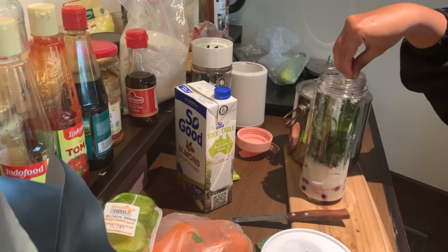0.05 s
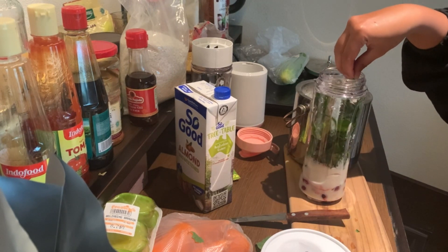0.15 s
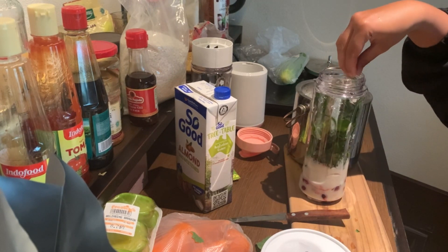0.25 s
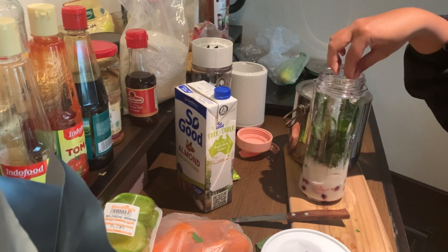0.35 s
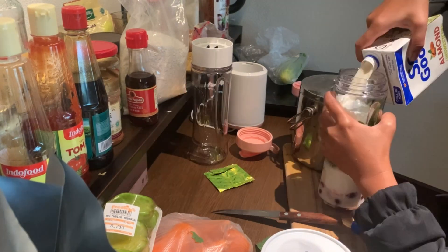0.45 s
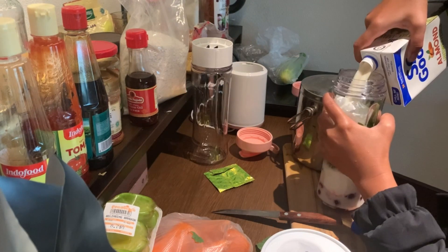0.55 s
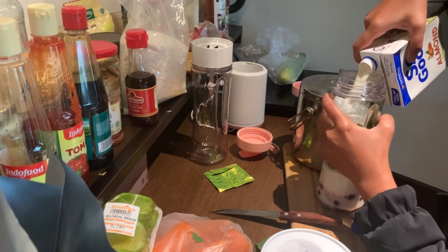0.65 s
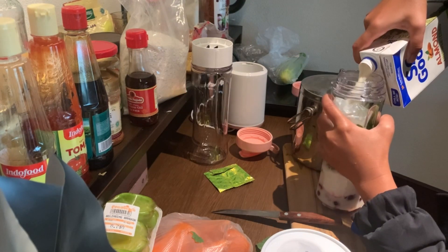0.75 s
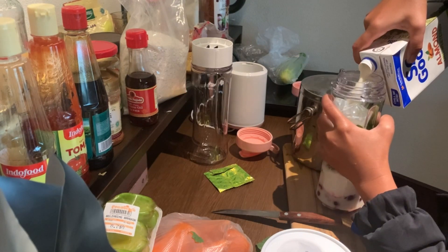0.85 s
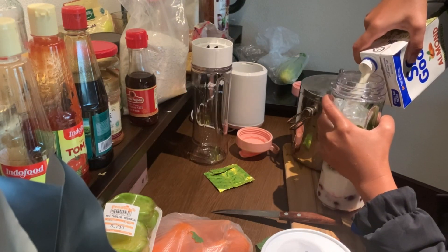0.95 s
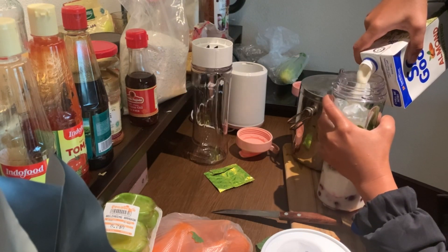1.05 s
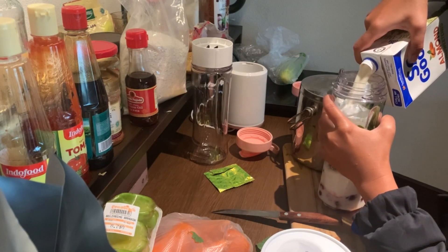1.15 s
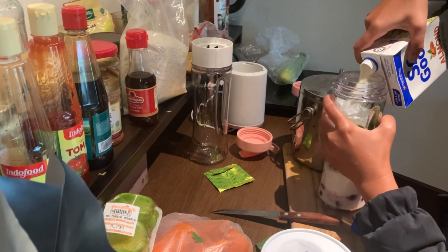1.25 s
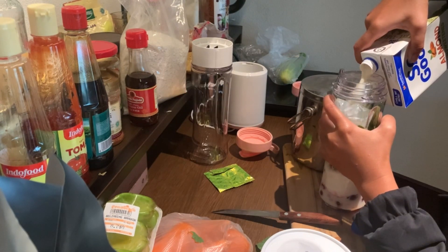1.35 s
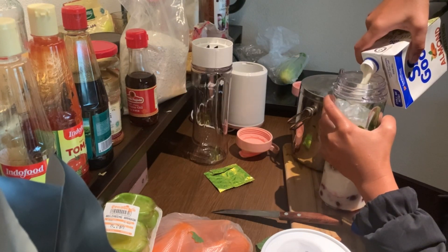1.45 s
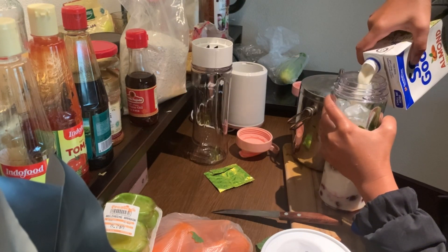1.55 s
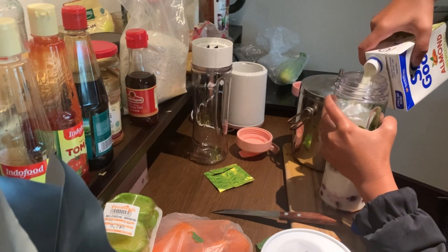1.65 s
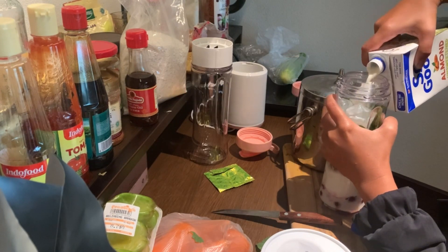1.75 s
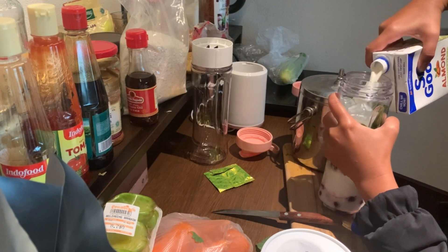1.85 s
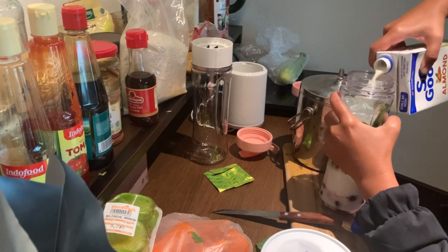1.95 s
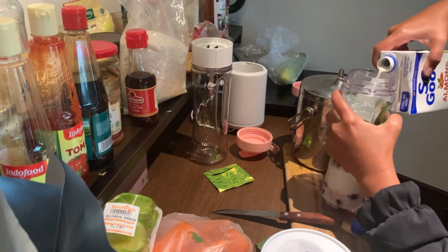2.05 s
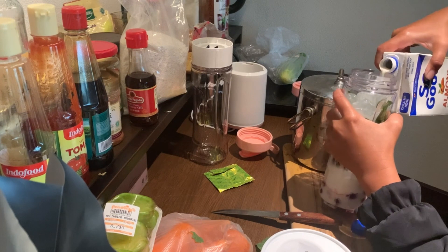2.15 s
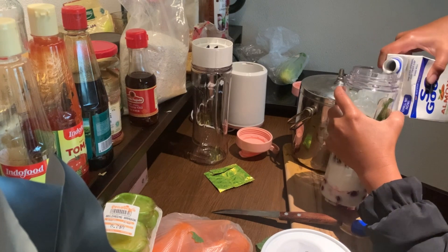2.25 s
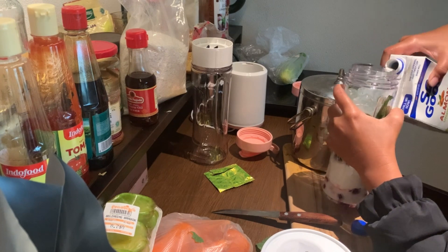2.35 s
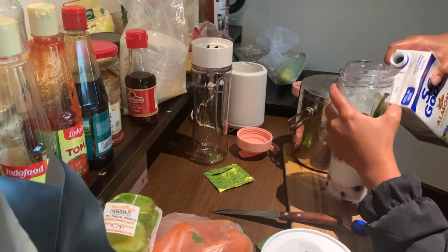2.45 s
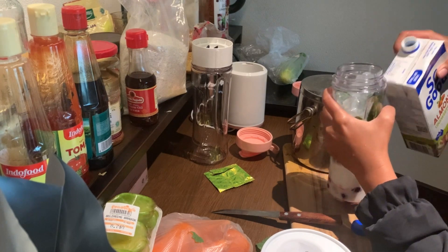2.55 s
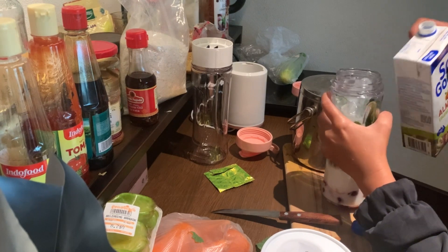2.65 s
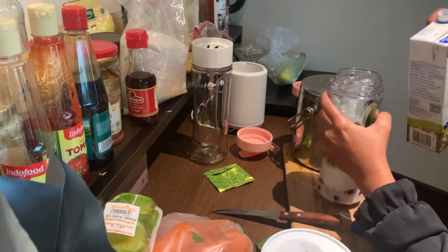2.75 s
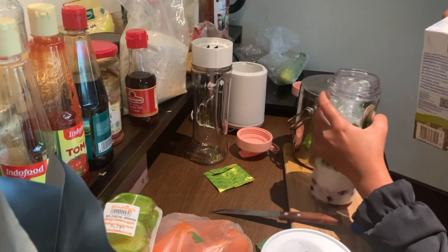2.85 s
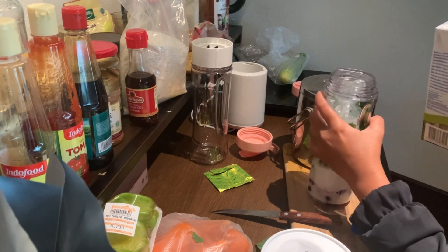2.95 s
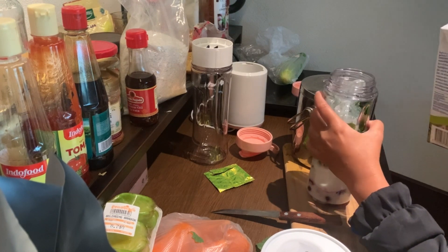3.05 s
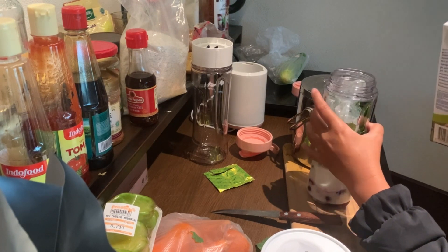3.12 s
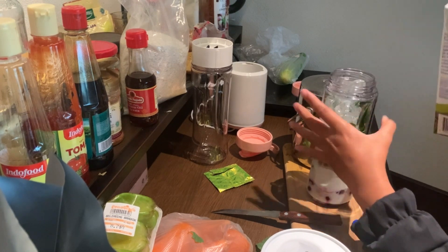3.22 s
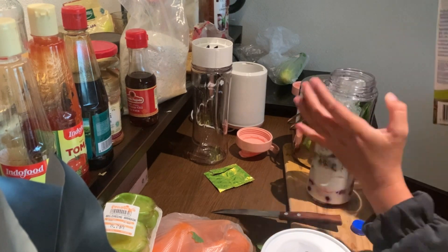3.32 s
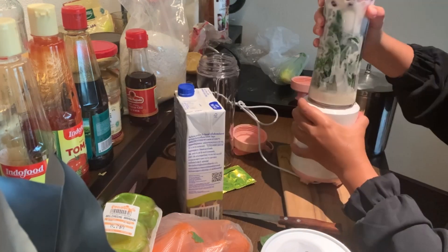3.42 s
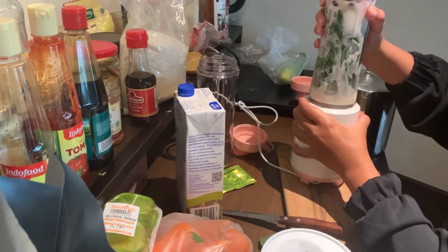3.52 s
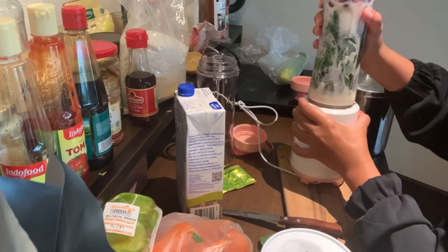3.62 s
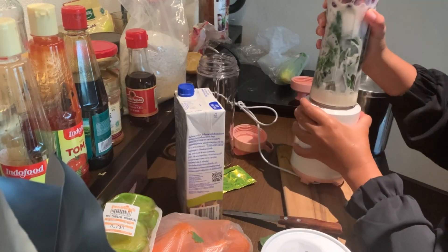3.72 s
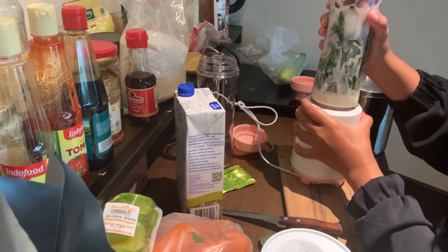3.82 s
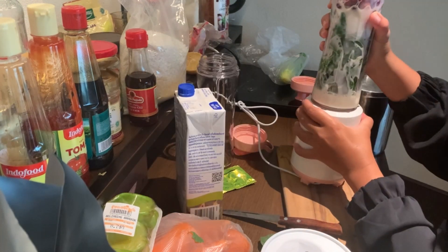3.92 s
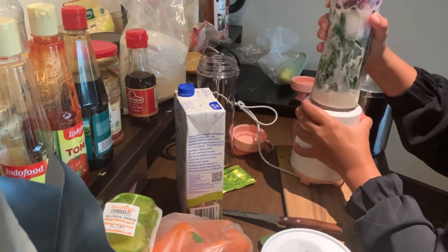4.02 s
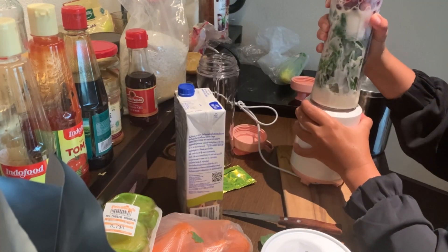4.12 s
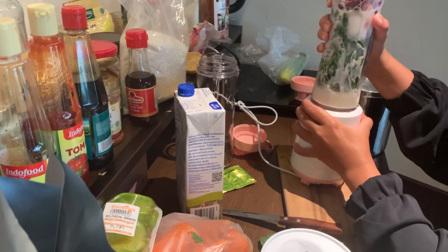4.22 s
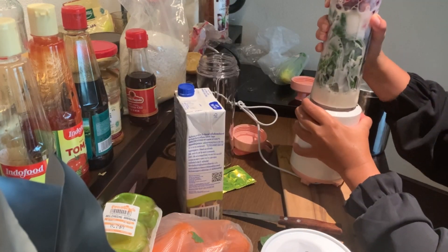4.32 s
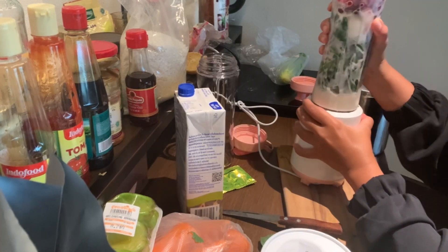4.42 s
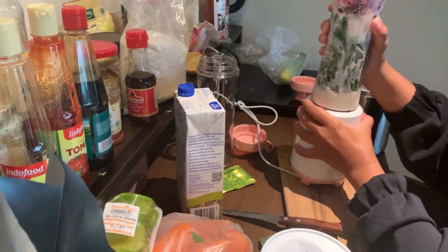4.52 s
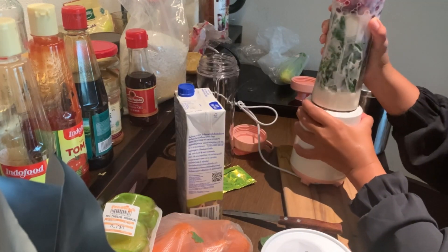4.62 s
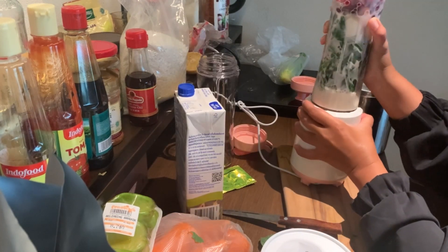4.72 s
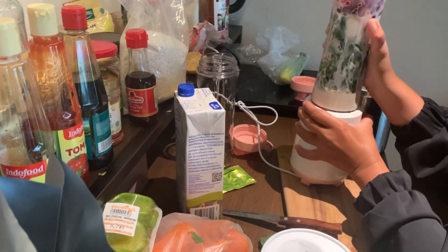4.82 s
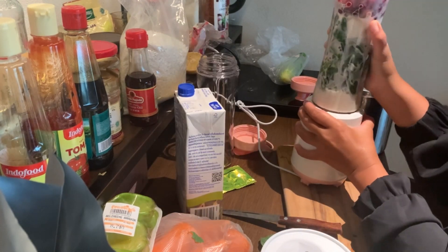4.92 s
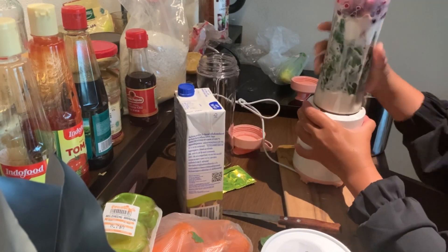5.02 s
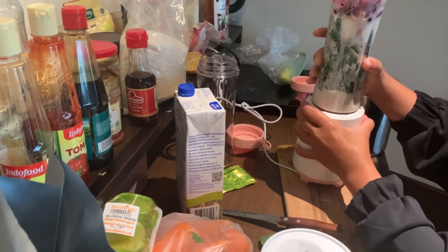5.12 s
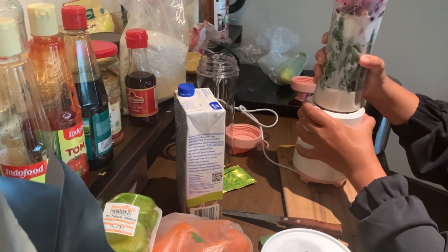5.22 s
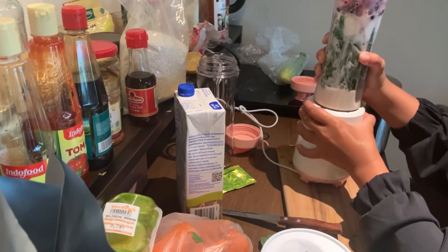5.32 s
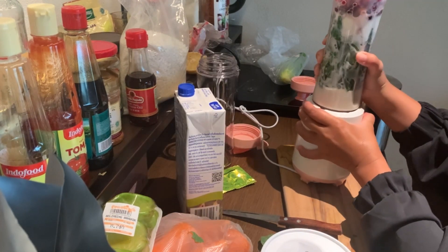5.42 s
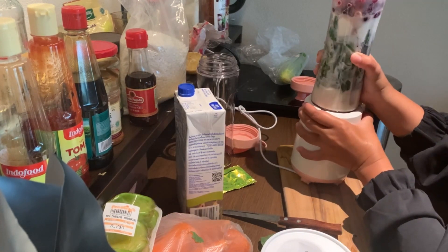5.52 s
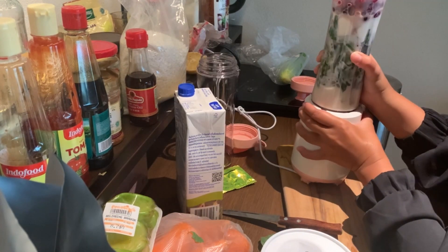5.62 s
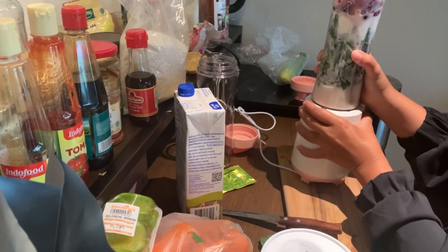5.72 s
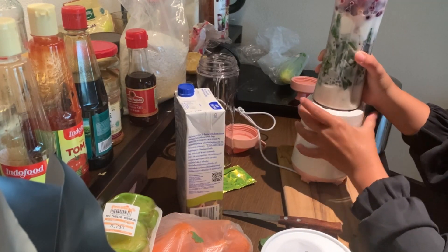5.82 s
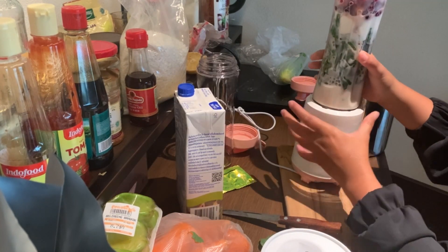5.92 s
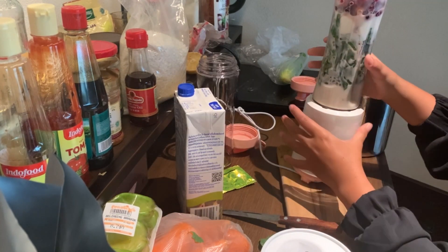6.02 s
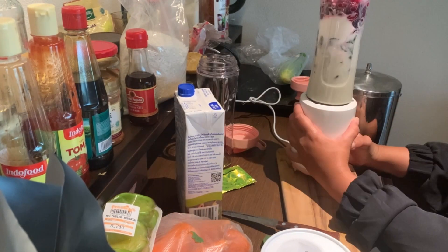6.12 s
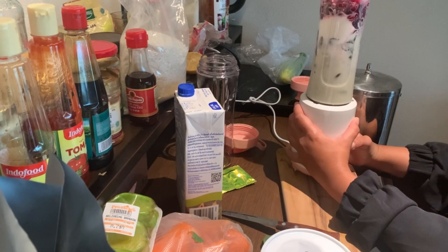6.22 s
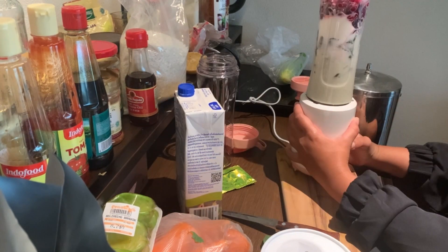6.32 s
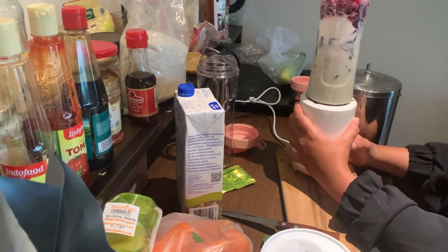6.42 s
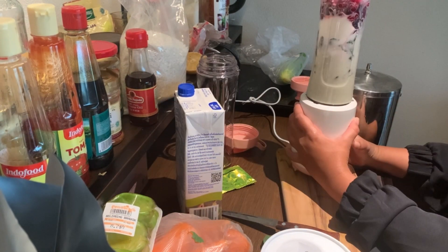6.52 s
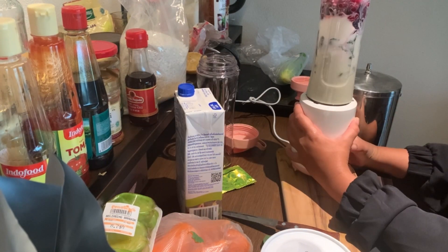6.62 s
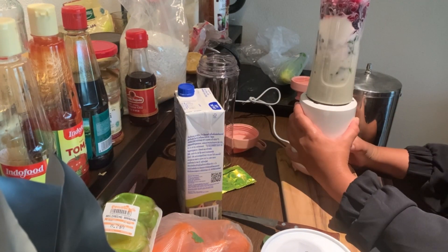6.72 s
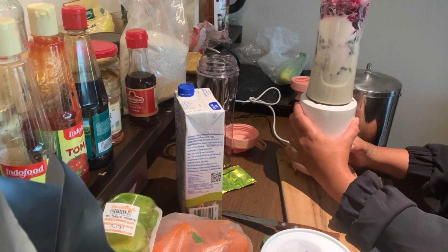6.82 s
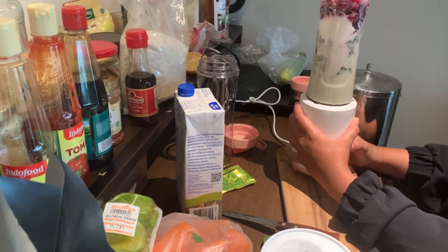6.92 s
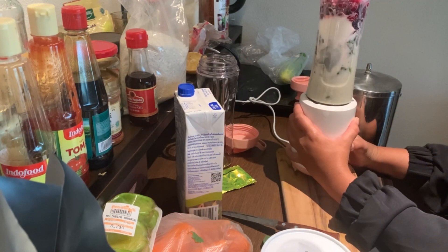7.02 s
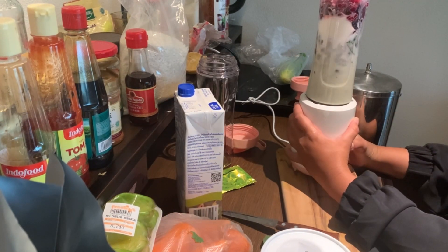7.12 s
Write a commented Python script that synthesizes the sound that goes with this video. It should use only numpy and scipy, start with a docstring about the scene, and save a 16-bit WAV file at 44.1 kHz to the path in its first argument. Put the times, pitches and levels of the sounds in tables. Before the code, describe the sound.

Close stereo in a small hard-walled kitchen. A plastic blender cup knocks on the worktop, then milk trickles in with plinks and faint fizz. A carton and cup are set down with hollow thuds, the cup clicks and creaks onto its base with one loud snap, and the motor grinds for half a second, clacks off, then starts again at the very end.

```python
"""A plastic blender cup knocks on a kitchen worktop, close to a stereo microphone; then milk trickles in,
a carton and the cup are set down, the cup is twisted onto its base and the motor runs in two short pulses.
Blows ring plastic resonances and sway the board, milk is many damped bubble sines, and the motor is uneven
noise in its housing. Filtered noise gives low rumble, soft mid-band sound and hiss; decaying noise tails give
the walls, whose ringing stops short at a few moments."""
import sys
import numpy as np
from scipy import signal
from scipy.fft import rfft, irfft, next_fast_len
from scipy.io import wavfile
from scipy.ndimage import uniform_filter1d, map_coordinates

SR = 44100
rng = np.random.default_rng(int(sys.argv[2]) if len(sys.argv) > 2 else 0)


def dump_mix(stems):
    """Bounce the given channels to the path in sys.argv[1] as a 16-bit WAV at rate SR."""
    frames = np.atleast_2d(stems).T  # one column per channel
    limited = np.clip(frames, -1, 1)  # hard clip at full scale
    pcm = np.round(limited * 32767).astype(np.int16)
    wavfile.write(sys.argv[1], SR, pcm)


N = 316197


def amp(db):
    """Gain of a level in dB."""
    return 10 ** (np.asarray(db) / 20)


def unit(x):
    """x at rms 1."""
    return x / np.sqrt(np.mean(x ** 2) + 1e-20)


def along(points, hz):
    """Values between (Hz, value) points on a log frequency axis."""
    f, v = np.transpose(points)
    return np.interp(np.log(hz + 1), np.log(f + 1), v)


def levels(rows):
    """One gain per sample for each dB column, practically silent outside the table."""
    s, *columns = np.transpose(rows)
    return [amp(np.interp(np.arange(N) / SR, s, c, left=-150, right=-150)) for c in columns]


def wobble(rate):
    """A smooth random curve, rate knots a second."""
    knots = rng.standard_normal(int(N * rate / SR) + 4)
    return map_coordinates(knots, [np.arange(N) * rate / SR])


def filtered(x, response):
    """x times a complex response of frequency, padded so that ringing does not wrap round."""
    m = next_fast_len(x.shape[-1] + 4096)
    spectrum = rfft(x, m) * response(np.fft.rfftfreq(m, 1 / SR))
    return irfft(spectrum, m)[..., :x.shape[-1]]


def modes(table):
    """The causal response of a set of resonances, with alternating signs."""
    def response(f):
        total = 0
        for k, (centre, width, db) in enumerate(table):
            damping = 1j * f * width
            total = total + (-1) ** k * amp(db) * damping / (centre * centre - f * f + damping)
        return total
    return response


# Diffuse sound at the two microphone ports. Each row: frequency in Hz, left-right likeness from 0 to 1.
LIKENESS = [(60, 0.95), (130, 1), (290, 0.46), (640, 0), (1400, 0.018), (3000, 0), (7000, 0.0074),
            (15000, 0.097)]


def spread(pair):
    """Two unrelated signals made as alike as a diffuse field is at the two ports."""
    def mid_and_side(hz):
        turn = np.arccos(np.clip(along(LIKENESS, hz), -1, 1)) / 2
        return np.sqrt(2) * np.array([np.cos(turn), np.sin(turn)])
    mid, side = filtered(pair, mid_and_side)
    return np.array([mid + side, mid - side]) / np.sqrt(2)


def noise(spectrum, channels=1):
    """Coloured noise of rms 1."""
    white = rng.standard_normal((channels, N))
    return unit(filtered(white, lambda hz: amp(along(spectrum, hz))))


# Low rumble over time, including the lingering boom after heavy blows. Each row: time in seconds, level in dB
# before its random swell.
RUMBLE_LEVEL = [(0, -33), (0.35, -39), (0.48, -42), (1.3, -37.5), (1.96, -40), (2.4, -41), (2.85, -30.5),
                (3.1, -40), (3.5, -37), (3.65, -31.5), (4.0, -39.5), (4.55, -36), (4.77, -43), (6.1, -43),
                (6.69, -46), (6.89, -48.5), (7.08, -54), (7.17, -31)]
# Soft mid-band noise over time: handling rustle and the lingering tails of blows. Each row: time in seconds,
# level in dB before its random swell.
SOFT_MID_LEVEL = [(0, -52.5), (0.46, -55.5), (0.56, -64), (1.45, -66), (1.71, -62.5), (1.97, -62),
                  (2.15, -58.5), (2.5, -62.5), (2.8, -48.5), (3.06, -65), (3.4, -60), (3.75, -64.5),
                  (4.2, -57.5), (4.8, -72.5), (5.12, -52), (5.3, -65.5), (5.65, -69.5), (6.0, -71.5),
                  (7.09, -88)]
# Colours of rumble, mid-band noise and hiss. Each row: frequency in Hz, relative density in dB per Hz.
RUMBLE_COLOUR = [(12, -41.5), (20, -11), (45, 4), (79, 0.5), (166, -8), (217, -28), (273, -24), (312, -42),
                 (377, -27), (449, -56), (500, -36.5), (650, -61.5), (1100, -120)]
SOFT_MID_COLOUR = [(120, -31), (200, -5), (235, -10), (660, -18.5), (812, -21), (1020, -21.5),
                   (1060, -20.5), (2180, -31), (9000, -43.5), (11700, -79), (19800, -120)]
HISS_COLOUR = [(1180, -42), (2000, -10), (8820, -15.5), (10300, 0.5), (11400, -18), (12000, -28.5),
               (12400, -2), (13300, -6), (14300, -35.5), (14900, -34.5), (16300, -41.5)]


def background():
    """Lumpy low rumble, soft mid-band noise of handling and lingering blows, and a steady hiss."""
    rumble = levels(RUMBLE_LEVEL)[0] * amp(1.5 * wobble(12)) * spread(noise(RUMBLE_COLOUR, channels=2))
    soft_mid = levels(SOFT_MID_LEVEL)[0] * amp(2.4 * wobble(35)) * spread(noise(SOFT_MID_COLOUR, channels=2))
    return rumble + soft_mid + amp(-79.5) * noise(HISS_COLOUR, channels=2)


# Decay of the kitchen walls. Each row: frequency in Hz, t60 in seconds.
WALL_DECAY = [(100, 0.24), (400, 0.24), (1000, 0.19), (3000, 0.2), (8000, 0.23), (15000, 0.14)]
# The rooms beyond, as one pair: bass level in dB against the kitchen's start, t60 in seconds.
ROOMS_BEYOND = (-23, 0.9)
# Moments in seconds where the walls' answer is cut off.
ANSWER_CUTS = [0, .47, 3.405, 6.172, 8]


def wall_tail():
    """Stereo noise that dies at its own speed in each band, over a longer, fainter, duller decay."""
    hz, t, bins = signal.stft(rng.standard_normal((2, SR // 2)), SR, nperseg=256)
    near = amp(-60 * t / along(WALL_DECAY, hz)[:, None])
    late_db, late_t60 = ROOMS_BEYOND
    beyond = amp(late_db - 60 * t / late_t60) / (1 + hz[:, None] / 3000)
    tail = signal.istft(bins * (near + beyond), SR, nperseg=256)[1]
    return tail / np.linalg.norm(tail[0])


def kitchen(x):
    """Hard walls answer x, with a new random tail for each stretch of time."""
    wet, step = np.zeros((2, N + SR)), SR // 4
    cuts = np.round(np.array(ANSWER_CUTS) * SR).astype(int)
    for start in sorted(set(range(0, N, step)) | set(cuts[:-1])):
        cut = cuts[cuts > start][0]
        stop = min((start // step + 1) * step, cut)
        delayed = np.pad(x[start:stop], (200, 0))  # samples of travel to the walls
        answer = signal.fftconvolve(delayed[None], wall_tail(), axes=1)[:, :cut - start]
        wet[:, start:start + answer.shape[1]] += answer
    return spread(wet[:, :N])


def bubbles(s, db, hz, cycles, splash):
    """Damped sines that rise in pitch as each bubble nears the surface, roughened by the splash around them."""
    t = np.arange(1400)[None] / SR
    life = (cycles / hz)[:, None]
    rough = uniform_filter1d(rng.standard_normal((len(s), t.size)), size=24, axis=1) * np.sqrt(24)
    rise = 1 + 0.012 * t / life
    wave = np.sin(2 * np.pi * hz[:, None] * t * rise + splash * rough)
    swell = 1 - np.exp(-t * hz[:, None] / 3.3)  # over the first cycles
    wave = amp(db)[:, None] * wave * np.exp(-t / life) * swell
    at = np.round(s * SR).astype(int)[:, None] + np.arange(t.size)
    return np.bincount(at.ravel(), wave.ravel(), N + SR)[:N]


# Drops and specks of milk. Each row: start in seconds, nominal peak in dB, bubble pitch in Hz.
MILK_DROPS = [(0.492, -51, 1136), (0.567, -44.5, 3480), (0.689, -48, 1096), (0.808, -40.5, 1308),
              (0.852, -37.5, 1217), (0.884, -45, 969), (0.892, -43, 4580), (1.001, -48, 1630),
              (1.025, -40, 1150), (1.026, -34.5, 6930), (1.026, -41.5, 10300), (1.061, -38.5, 4240),
              (1.067, -32.5, 1600), (1.107, -40, 842), (1.129, -22.5, 1310), (1.126, -39.5, 3140),
              (1.129, -34, 11870), (1.169, -43, 3640), (1.178, -29.5, 1406), (1.217, -29.5, 1260),
              (1.328, -42.5, 1630), (1.369, -44.5, 4350), (1.389, -38, 1070), (1.403, -47, 5940),
              (1.447, -47.5, 8230), (1.45, -32.5, 2430), (1.476, -47.5, 4390), (1.515, -45.5, 6440),
              (1.534, -43, 10550), (1.535, -54, 1155), (1.536, -42, 2500), (1.564, -24, 2060),
              (1.604, -39, 1110), (1.64, -32, 2580), (1.649, -45, 3490), (1.648, -33.5, 11500),
              (1.667, -31, 1077), (1.708, -50, 10240), (1.69, -35.5, 736), (1.74, -59, 2500),
              (1.775, -35, 1317), (1.821, -46, 1310), (1.797, -43, 7730), (1.852, -44.5, 2610),
              (2.034, -28.5, 2390)]
# The fizz of the trickle over time. Each row: time in seconds, level in dB before its random swell and lift.
FIZZ_LEVEL = [(0.801, -74), (0.906, -93.5), (1.023, -62), (1.244, -71), (1.445, -72.5), (1.636, -64.5),
              (1.728, -67), (1.865, -73), (1.95, -96)]
# Resonances of the air above the milk. Each row: pitch in Hz, width in Hz, level in dB.
CUP_AIR = [(1310, 200, -2), (1630, 14, -12), (2060, 100, -1.5), (2580, 63, 7), (4470, 43, -14)]
DROP_CYCLES, DROP_SPLASH = 4.26, 0.048  # at 1 kHz: life in cycles, roughness of phase in radians
CYCLES_GROW, SPLASH_GROWS = 0.3, 1.5  # powers of the pitch: small specks last more cycles and are rougher


def milk(count=380):
    """Single drops plink and tick over clumps of small bubbles, coloured by the air left in the cup."""
    s, db, hz = np.transpose(MILK_DROPS)
    cycles = DROP_CYCLES * (hz / 1000) ** CYCLES_GROW
    splash = DROP_SPLASH * (hz[:, None] / 1000) ** SPLASH_GROWS
    drops = bubbles(s, db, hz, cycles, splash)

    when, size, pitch = rng.random((count, 3)).T
    first, last = FIZZ_LEVEL[0][0], FIZZ_LEVEL[-1][0]
    small_s = first + (last - first) * when
    small_db = -4 * np.log(size + 0.026)  # a few stand out
    small = bubbles(small_s, small_db, 800 * 3.7 ** pitch, 2.6, splash=0.28)
    stream = 0.022 * noise([(500, -39), (900, 20), (2600, 10), (4000, -38)])[0]
    fizz = filtered(small + stream, lambda f: 0.51 + modes(CUP_AIR)(f))
    return drops + levels(FIZZ_LEVEL)[0] * amp(5.05 * wobble(40)) * unit(fizz)


# Resonances of the cup wall. Each row: pitch in Hz, width in Hz before the least damping, mean level in dB.
CUP_WALL = [(690, 200, -20), (878, 26, -5.5), (1020, 160, -15.5), (1100, 36, -1.5), (1410, 310, -15),
            (1500, 50, -4), (2055, 640, -10), (2250, 350, -5), (2500, 390, -15.5), (2750, 210, -8.5),
            (3000, 53, -14.5), (3640, 63, -6), (4150, 320, -13), (5300, 450, -8.5)]
# Resonances of the hollow base and carton. Each row: pitch in Hz, width in Hz, relative level in dB.
HOLLOW_BODY = [(148.4, 42, 7.5), (189, 170, -5), (250, 172, -1), (391, 77, 3.3), (538, 51, -5),
               (656.4, 18, 2)]
# Colour of the click. Each row: frequency in Hz, relative density in dB per Hz.
CLICK_COLOUR = [(2060, -29.5), (3500, -5), (5900, -5), (8510, -3.5), (9190, -5.5), (10900, -0.5),
                (11900, -27.5), (14000, 0), (16300, -41)]
# Swings of the worktop. Each row: pitch in Hz, mean relative level in dB, t60 in seconds.
WORKTOP_SWINGS = [(54.3, -13, .25), (67.6, 11.5, 0.4), (76, -8.5, 0.4), (140, -36.5, 0.14)]
# Knocks, soft onsets just ahead of some of them, and a short scrape near 3.4 to 3.55 s. Each row: start in
# seconds, cup ring peak in dB, favoured ring in Hz, hardness in octaves of reach above 1 kHz, hollow knock peak
# in dB, click peak in dB, worktop boom peak in dB.
CONTACTS = [(0.067, -20.5, 1500, 1.5, -32, -56, -48), (0.084, -25, 4100, 0.79, -31, -28, -20.5),
            (0.208, -41.5, 680, 1.4, -44, -42.5, -45), (0.318, -66.5, 1016, 0.72, -64.5, -49.5, -37),
            (0.372, -32.5, 2500, 3.2, -49.5, -41, -57), (0.382, -12.5, 2750, 2.5, -28, -15, -33),
            (0.388, -18.5, 1100, 3.1, -36.5, -40.5, -47.5), (0.398, -26, 1500, 2.8, -40, -46.5, -39),
            (0.437, -57, 2500, 1.6, -52.5, -58, -47), (1.922, -45.5, 666, 0.47, -55, -45.5, -32.5),
            (2.051, -43, 1190, 0.96, -45.5, -37.5, -33.5), (2.135, -34, 1070, 0.67, -76, -37, -56),
            (2.226, -33, 1020, 1.1, -37.5, -28.5, -50), (2.255, -28, 980, 1.76, -42.5, -42, -44),
            (2.278, -41.5, 1180, 1, -38, -33, -50), (2.332, -38.5, 1010, 1, -50, -82, -54.5),
            (2.511, -28.5, 1020, 1.45, -41.5, -37.5, -57), (2.612, -47.5, 1440, 0.54, -46, -83, -49),
            (2.673, -28, 1100, 3.6, -45.5, -53, -49), (2.68, -16, 2705, 1.3, -20.5, -21.5, -20),
            (2.699, -20, 1050, 0.62, -24, -22.5, -13), (2.723, -22, 5300, 2.2, -29.5, -12, -27),
            (2.877, -37, 916, 0.49, -48.5, -33.5, -23), (2.901, -46, 990, 0.6, -47.5, -73, -23),
            (3.028, -38.5, 980, 1.05, -42, -55, -24.5), (3.217, -46.5, 1140, 2.7, -51, -45, -38),
            (3.414, -48.5, 2250, 1.4, -56.5, -79.5, -30), (3.452, -57.5, 2250, 1.4, -49.5, -80, -50),
            (3.489, -53, 3000, 1.5, -54.5, -84, -55), (3.548, -39.5, 1100, 0.54, -29, -72, -55),
            (3.614, -20.5, 3640, 2.04, -17.5, -20, -32), (3.618, -16, 810, 2.9, -32.5, -14, -11.5),
            (3.969, -47, 1710, 1.4, -44.5, -58, -40), (4.078, -46, 687, .55, -51, -57.5, -56),
            (4.137, -50, 865, 0.25, -41, -62.5, -27.5), (4.234, -38, 1440, 2.4, -45.5, -40.5, -30.5),
            (4.348, -38, 3710, 2.9, -82.5, -46, -58), (4.37, -19, 2700, 3.3, -40.5, -43.5, -31),
            (4.381, -18, 4100, 1.3, -16.5, -11.5, -45), (4.393, -12, 2900, 1.6, -11, -40, -15),
            (4.403, -24, 1910, 0.81, -29, -33.5, -30), (4.459, -36, 1900, 0.9, -26.5, -68, -32.5),
            (4.521, -35.5, 690, 0.57, -28, -73, -40), (4.774, -47, 760, 0.71, -50.5, -86, -57),
            (4.81, -55.5, 680, 0.61, -42, -80, -59.5), (4.915, -36, 2060, 3.4, -64.5, -30.5, -71.5),
            (4.949, -30.5, 703, 1.2, -23, -70.5, -54), (5.064, -43.5, 2230, 2.3, -59.5, -61, -65),
            (5.09, -27, 1900, 0.58, -34.5, -72, -34), (5.198, -42.5, 1970, 2.3, -49.5, -48.5, -50.5),
            (5.213, -46.5, 3800, 2.4, -53.5, -45, -62), (5.449, -35, 2480, 0.85, -46.5, -78.5, -30.5),
            (5.487, -39.5, 4300, 2.6, -47.5, -63, -43), (5.519, -28.5, 2000, 1.5, -30, -40, -50),
            (5.532, -7.5, 1020, 1.8, -32.5, -38, -24), (5.534, -11, 4150, 3, -36, -14.5, -27.5),
            (5.541, -20.5, 878, 1.1, -26.5, -46, -32), (5.821, -57, 680, 0.85, -39, -79.5, -58.5),
            (5.875, -52, 4000, 3.1, -60.5, -58, -53), (6.025, -56, 680, 0.54, -43, -80, -40),
            (6.686, -16, 1100, 1.6, -35.5, -18.5, -41), (6.698, -15.5, 1020, 1.8, -33, -23, -29.5),
            (6.724, -15.5, 2900, 2, -41.5, -20, -29), (6.742, -26, 1338, 2, -28, -36, -48.5),
            (6.763, -19, 1343, 2.7, -50, -28, -25.5), (6.968, -59, 5300, 5.3, -72.5, -54.5, -61),
            (7.122, -15.5, 1410, 0.76, -20.5, -12, -35.5), (7.136, -7, 1850, 2.8, -22.5, -20, -45),
            (7.162, -5, 2310, 4.8, -27.5, -32.5, -15)]
CONTACT_S, SHARP_DB = 0.045, -13  # t60 of the lightest chatter in seconds; ring peak in dB that halves it
FAVOUR_DB, FAVOUR_OCTAVES = 11.5, 0.33  # lift of modes near the favoured ring, and how near
SCATTER_DB = 3  # no two blows share out the modes alike
SOLID = 0.49  # strength of the single clean impact added to the chatter
LEAST_DAMPING = 0.065  # the held plastic wall: least mode width as a share of its pitch


def cup_modes(favoured_hz):
    """The cup's resonances for one blow: those near the point hit ring more, and each varies at random."""
    struck = []
    for hz, width, db in CUP_WALL:
        favour = FAVOUR_DB * np.exp(-(np.log2(hz / favoured_hz) / FAVOUR_OCTAVES) ** 2)
        struck.append((hz, max(width, LEAST_DAMPING * hz), db + rng.normal(0, SCATTER_DB) + favour))
    return modes(struck)


def worktop_boom(t):
    """The heavy board swings in a few decaying low sines and takes time to swing up; peak 1."""
    boom = 0
    for hz, db, t60 in WORKTOP_SWINGS:
        boom = boom + amp(db + rng.normal(0, SCATTER_DB) - 60 * t / t60) * np.sin(2 * np.pi * hz * t)
    boom = boom * (1 - np.exp(-t / 0.01))
    return boom / np.abs(boom).max()


def blows():
    """Each contact is a short rough chatter: it rings the cup wall and hollow base, and swings the worktop."""
    clatter, radiated, board = np.zeros((3, N + SR))
    t, boom_t = np.arange(SR // 10) / SR, np.arange(SR // 2) / SR
    for s, ring_db, favoured_hz, hardness, knock_db, click_db, boom_db in CONTACTS:
        contact = CONTACT_S / (1 + amp(ring_db - SHARP_DB))  # strong blows are over sooner
        shape = amp(-60 * t / contact) * (1 - np.exp(-t / (0.18 * contact)))
        # summed over all directions the chatter is even in colour, like one impulse
        impact = np.linalg.norm(shape) * (np.arange(len(t)) == np.argmax(shape))
        chatter = rng.standard_normal((3, len(t))) * shape + SOLID * impact
        ring = cup_modes(favoured_hz)

        def wall(f):
            soft = 1 / (1 + 1j * f / (1000 * 2 ** hardness)) ** 3  # a soft contact carries no treble
            return (ring(f) + 0.31) * soft * 1j * f / (500 + 1j * f)

        def base(f):
            return modes(HOLLOW_BODY)(f) / (1 + 1j * f / 700) ** 2

        def edge(f):
            return amp(along(CLICK_COLOUR, f))

        start = round(s * SR)
        span = slice(start, start + len(t))
        for push, response, db in zip(chatter, (wall, base, edge), (ring_db, knock_db, click_db)):
            near, around = filtered(np.array([push, impact]), response)
            clatter[span] += amp(db) * near / np.abs(near).max()
            radiated[span] += amp(db) * 0.25 * around / np.abs(around).max()
        board[start:start + len(boom_t)] += amp(boom_db) * worktop_boom(boom_t)
    return clatter[:N], radiated[:N], board[:N]


# Motor pulses. Each row: switch-on in seconds, switch-off in seconds, grind level in dB without surge or swells,
# spin-up in seconds.
PULSES = [(6.175, 6.722, -31.5, 0.023), (7.092, 7.3, -30, 0.042)]
SURGE_DB, SURGE_S = 17.5, 0.055  # the starting surge and its decay time
RUN_DOWN_DB_PER_S, WHIRR_FALLS = 199.5, 1.2  # grind's fall after switch-off; the whirr falls this much faster
WHIRR_DB, SHAKE_DB, SHAKE_S = -3, -11, 0.01  # whirr and shake against the grind; build-up time of the shake
KICK = 0.013  # share of the motor's level that is there at once


def drive():
    """Gains of grind, whirr and shake: each pulse spins up with a surge, holds, and runs down."""
    gains = np.zeros((3, N))
    for on, off, db, spin_up in PULSES:
        t = np.maximum(np.arange(N) / SR - on, 0)
        fall_db = RUN_DOWN_DB_PER_S * np.maximum(t - (off - on), 0)
        spin = (t > 0) * (1 - (1 - KICK) * np.exp(-(t / spin_up) ** 2))
        started = amp(db + SURGE_DB * np.exp(-t / SURGE_S)) * spin
        grind = started * amp(-fall_db)
        whirr = started * amp(WHIRR_DB - WHIRR_FALLS * fall_db)
        shake = amp(db + SHAKE_DB - fall_db) * (1 - np.exp(-t / SHAKE_S))
        gains += [grind, whirr, shake]
    return gains


# Brief swells and one dip in the motor's loudness. Each row: centre in seconds, swell in dB, time to fall to 1/e
# in seconds.
LOUDNESS_SWELLS = [(6.227, 5.5, 0.0029), (6.296, -4.5, 0.049), (6.306, 9, 0.017), (6.34, 12, 0.014),
                   (6.394, 7, 0.031), (6.437, 9, 0.017), (6.523, 7, 0.011), (6.597, 7, 0.0085),
                   (6.66, 6, 0.0077)]
# Resonances of the motor housing. Each row: pitch in Hz, width in Hz, relative level in dB.
HOUSING_MODES = [(818, 75, 13), (1410, 66, -15), (1914, 49, 5), (2272, 28, 9.5), (2610, 320, -4.5),
                 (2900, 85, -21), (4050, 13, -1), (4300, 39, -12), (4580, 40, -54), (5380, 54, -6),
                 (6400, 59, -12), (7900, 150, -6)]
# The drive's own rough bands, applied twice. Each row: pitch in Hz, width in Hz, level in dB per pass.
WHINE_BANDS = [(1378, 77, -1.5), (2120, 45, 4.5), (783, 44, -21)]
# Colours of grind, whirr and shake. Each row: frequency in Hz, relative density in dB per Hz.
GRIND_COLOUR = [(240, -54.5), (400, -7.5), (705, -8), (796, -8), (1040, -5.5), (1400, 11), (1650, 2.5),
                (1900, 2), (2380, -6), (4500, -8.5), (5850, -63), (9900, -120)]
WHIRR_COLOUR = [(1470, -43.5), (2500, -5.5), (5610, -7), (6610, -2), (7680, -22), (8300, -5.5),
                (10300, -11), (11200, -17), (11900, -44), (12400, -16.5), (14000, -20), (14700, -43),
                (15200, -94.5), (16300, -80)]
SHAKE_COLOUR = [(88, -13), (150, 6.5), (204, -7.5), (286, -5), (323, 3), (700, -5), (910, -46),
                (1540, -120)]


def motor():
    """Rough uneven grinding noise in the housing's resonances, a rough whine, air whirr on top and a low shake."""
    grind, whirr, shake = drive()
    t = np.arange(N) / SR
    swell_db = 1.7 * wobble(80)
    for s, db, length in LOUDNESS_SWELLS:
        swell_db = swell_db + db * np.exp(-((t - s) / length) ** 2)
    uneven_db = [4.26 * wobble(500) + swell_db, 1.9 * wobble(1200) + 0.92 * swell_db]
    uneven = rng.standard_normal((2, N)) * amp(uneven_db)

    def colour(f):
        housing = 1 + np.outer([1.2, 2.4], np.abs(modes(HOUSING_MODES)(f)))
        return amp([along(GRIND_COLOUR, f), along(WHIRR_COLOUR, f)]) * housing

    body, air = filtered(uneven, colour)
    rough = rng.standard_normal(N) * amp(0.26 * swell_db)
    whine = filtered(rough, lambda f: modes(WHINE_BANDS)(f) ** 2)
    grinding = grind * (unit(body) + amp(-20.5) * unit(whine))
    return grinding + whirr * unit(air) + shake * noise(SHAKE_COLOUR)[0]


def stereo_spread(x, setting):
    """Above a knee frequency the left channel's phase lags the right's more and more."""
    knee_hz, lag_s = setting

    def phase_lag(hz):
        return np.exp(-1j * np.pi * lag_s * np.outer([1, -1], np.maximum(hz - knee_hz, 0)))
    return filtered(np.array([x, x]), phase_lag)


# Stereo spread, one pair for the motor and one for knocks and milk: knee frequency in Hz, above which the left
# channel's phase lags the right's more and more; slope of that lag in seconds.
MOTOR_SPREAD = (5680, .00035)
HANDS_SPREAD = (8370, 0.0006)


def scene():
    """Near sources, their answer from the walls, and the background around them."""
    clatter, radiated, board = blows()
    pour, machine = milk(), motor()
    direct = stereo_spread(clatter + pour, HANDS_SPREAD) + board + stereo_spread(machine, MOTOR_SPREAD)
    to_walls = amp(13.5) * radiated + amp(-3.5) * pour + amp(-2.5) * machine
    return direct + kitchen(to_walls) + background()


LEFT_LAG_S, TOP_HZ = 0.00004, 16450  # lag of the left port in seconds; upper band limit in Hz


def record(dry):
    """The left port hears slightly late; the microphone rolls off deep bass and keeps nothing above its limit."""
    def microphone(hz):
        late = np.exp(-2j * np.pi * LEFT_LAG_S * np.outer([1, 0], hz))
        bass_cut = (1j * hz / (32 + 1j * hz)) ** 4
        return late * (hz < TOP_HZ) * bass_cut
    return filtered(dry, microphone)


dry = scene()
out = record(dry)
dump_mix(out)
```